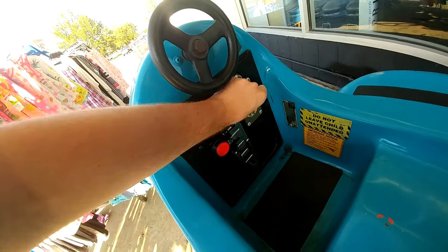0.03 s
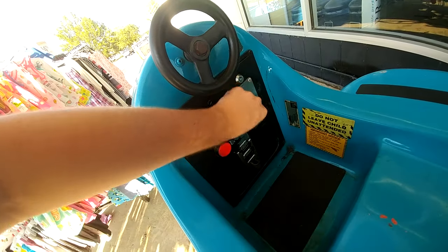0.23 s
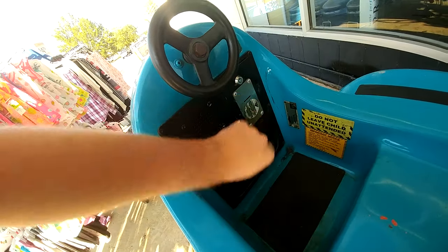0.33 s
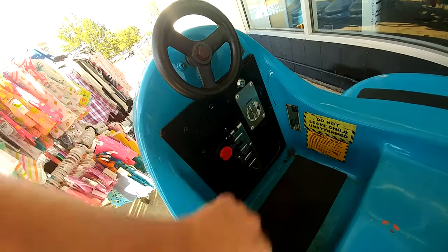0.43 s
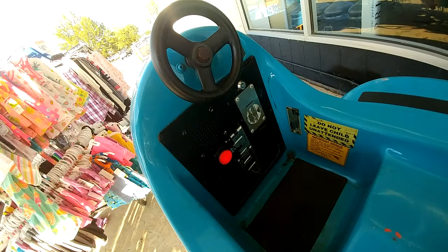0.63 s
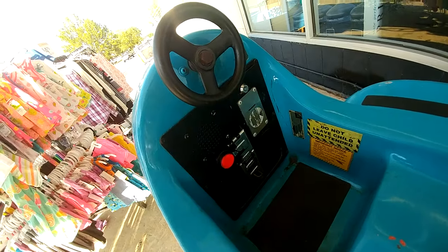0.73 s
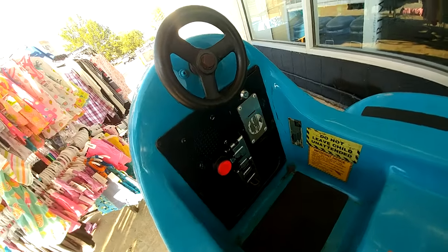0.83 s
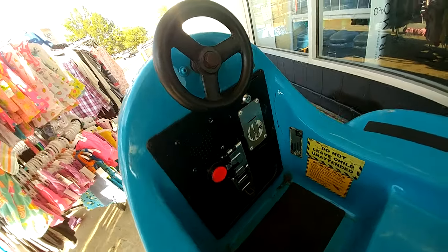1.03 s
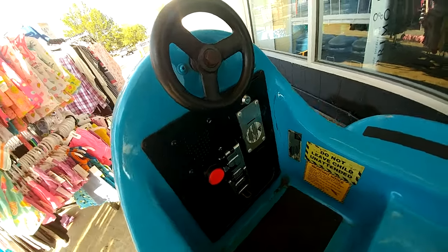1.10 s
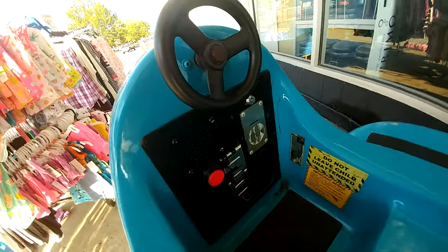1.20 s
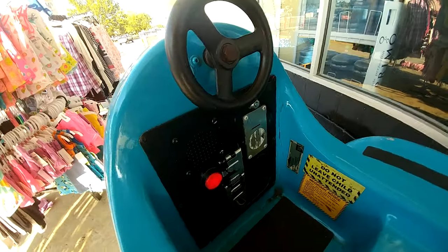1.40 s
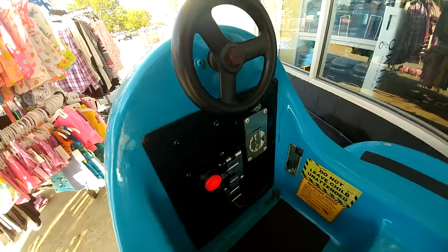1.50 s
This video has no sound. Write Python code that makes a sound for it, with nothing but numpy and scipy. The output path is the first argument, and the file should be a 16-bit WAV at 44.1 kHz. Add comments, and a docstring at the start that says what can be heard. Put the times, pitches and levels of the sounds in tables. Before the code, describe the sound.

A coin goes into an amusement ride's slot, heard close up, ticking and scraping on the metal plate for the first half second. At about 0.5 seconds it hits the mechanism with a loud steel clunk, and at 0.7 it bounces, ringing, in the cash box. Clothing brushes faintly near 1.3 seconds. A soft motor hum and low shop rumble continue throughout, ending at about 1.5 seconds.

```python
"""A coin goes into a fibreglass amusement ride, heard close up in a quiet shop.
It ticks, squeaks and scrapes on the slot plate, drops through the mechanism with a steel clunk,
then lands ringing in the cash box. Behind it a motor hums over low rumble and shop air;
clothing brushes faintly as the arm is drawn back. The stereo microphone's two ports
each colour the treble in their own way."""
import sys
import numpy as np
from scipy import signal
from scipy.fft import rfft, irfft
from scipy.io import wavfile

SR = 44100
rng = np.random.default_rng(int(sys.argv[2]) if len(sys.argv) > 2 else 0)


def file_out(sig):
    """Save sig as 16-bit WAV at sys.argv[1]."""
    # one column per channel
    cols = np.atleast_2d(sig).T
    # limit, then scale
    lim = np.clip(cols, -1, 1)
    pcm = np.round(lim * 32767).astype(np.int16)
    wavfile.write(sys.argv[1], SR, pcm)


N = 68355
T = np.arange(N) / SR

# Table levels are relative; "density" is level per hertz.
# likeness of the two channels: f/Hz, left-right correlation
STEREO_LIKENESS = [(60, 0.86), (160, 1), (380, 0.69), (700, 0.73), (1200, 0), (2400, 0.028), (15000, 0.063)]
# peaks and dips of each microphone port: f/Hz, gain/dB, width/Hz
LEFT_PORT = [(6300, -5, 2800), (9020, -23.5, 780), (10010, 11.5, 1700), (13300, 3.5, 5100)]
RIGHT_PORT = [(2600, 2, 3300), (7450, 13.5, 1240), (9400, -19, 870), (11700, -1, 12000)]

# reverberation of the shop: f/Hz, density/dB, t60/s
SHOP_REVERB = [(200, -12, .5), (1010, -8, 0.15), (6000, -5, 0.43), (15000, 7, 0.19)]
# spectra of the shop air, the low rumble and the clothing: f/Hz, density/dB
AIR_SPECTRUM = [(150, -29.5), (380, -9.5), (560, 1.5), (740, -3.5), (1050, -11.5), (1400, -17),
                (2200, -26.5), (4500, -31), (7500, -32.5), (11000, -34), (15500, -66)]
RUMBLE_SPECTRUM = [(20, -19), (32, -32), (50, -1), (65, -3), (82, -5.5), (125, -2.5), (170, -2), (240, -16),
                   (400, -25)]
CLOTH_SPECTRUM = [(1000, -4), (3000, 2), (6500, 8), (10000, -2), (15000, -15)]
# motor tones: f/Hz, level/dB, pitch waver/Hz
HUM_TONES = [(62.7, -42, 4.05), (97.5, -43, 3.04), (154.7, -31.5, 0.57), (599, -54.5, 3.21),
             (648, -51.5, 4.1)]
# rise and fall of the rumble, the hum and the clothing: t/s, level/dB
RUMBLE_SWELL = [(0, -2.5), (.25, 3.5), (.45, -4), (.65, 1), (.9, 1.5), (1.2, -2), (1.55, 0)]
HUM_SWELL = [(0, -3), (.15, -1.5), (.33, 3.5), (.52, -3), (.75, -1.5), (1.27, -0.5), (1.55, -1.5)]
CLOTH_SWELL = [(1.18, -66), (1.28, -56.5), (1.325, -46), (1.365, -50.5), (1.41, -62), (1.55, -66)]

# the coin touches the slot: t/s, plate level/dB, panel knock level/dB, rim tick level/dB
SLOT_TOUCHES = [(0.0245, -40.5, -44, -63), (.151, -41, -41.5, -59), (.184, -47, -48, -71),
                (0.228, -38.5, -41.5, -34.5), (0.2362, -24, -29.5, -46), (0.2859, -33.5, -41, -31),
                (0.3101, -20.5, -41.5, -40), (.327, -25, -47, -45), (.344, -30, -46, -33),
                (0.356, -35, -39.5, -32), (0.41, -29.5, -38, -31), (0.4201, -30.5, -32.5, -31),
                (0.4399, -17, -34, -13.5), (0.4486, -32, -32, -32), (0.473, -33.5, -43, -38)]
# dense rings of the slot plate, the panel around it, the coin's rim and the whole coin:
# f/Hz, density/dB, t60/s
PLATE_RING = [(1500, -23.5, 0.25), (2690, -13, 0.48), (3800, -22.5, 0.15), (5900, -4, 0.079), (7780, 2, .1),
              (8460, -4.5, 0.076), (11800, -14, 0.045), (15600, -14.5, 0.037)]
PANEL_RING = [(200, 0, 0.59), (520, -5.5, 0.22), (1260, -3, 0.36), (1850, -2.5, .15), (2900, -8.5, 0.067),
              (4470, -2, 0.23), (8000, -17, 0.19)]
RIM_RING = [(5000, -22, 0.11), (8500, -1, 0.11), (9950, 2.5, 0.084), (10900, -8, 0.094), (12200, 0, 0.045),
            (14500, -8, 0.041), (16000, -11, .06)]
COIN_RING = [(13000, -65, 0.12), (14600, -15, 0.1), (14900, -4, .13), (15740, 11, .14), (15500, -8, .13),
             (16300, -36, .1)]
# clear modes of the slot plate: f/Hz, level/dB, t60/s
PLATE_MODES = [(2350, -20, 0.28), (2816, -15, 0.33), (3100, -24, 0.14), (5930, -6, 0.073),
               (6800, -12, 0.046), (7640, -10, .08)]
# pressure of the sliding edge: t/s, level/dB
SCRAPE_PRESSURE = [(.284, -49), (.292, -26.5), (.306, -42), (.316, -32.5), (.36, -32.5), (.374, -50.5),
                   (.405, -42), (.42, -29)]
# tones of the sticking edge: f/Hz, level/dB
SQUEAK_TONES = [(3800, -43), (7830, -36), (10500, -27)]
# blows on the way in that set the coin itself ringing: t/s, level/dB
COIN_BLOWS = [(.3105, -25), (.327, -30), (.344, -39), (.5128, -40)]

# the coin's run down the chute: t/s, level/dB
ROLL_SWELL = [(.41, -44), (.45, -36), (.49, -39), (.53, -34), (.62, -47)]
# rumble of the chute: f/Hz, density/dB
CHUTE_SPECTRUM = [(120, -22), (220, -5.5), (270, -3.5), (350, -21), (700, -17)]
# the coin strikes the mechanism and rattles: t/s, level/dB
CLUNKS = [(0.5102, -11.5), (.5128, -11.5), (0.5159, -10.5), (0.5267, -17.5), (0.55, -19.5)]
# dense ring of the mechanism: f/Hz, density/dB, t60/s
MECHANISM_RING = [(158, -4, 0.71), (382, -23, 0.12), (633, -19, 0.32), (950, -4, 0.28), (1920, -0.5, 0.17),
                  (3800, -5.5, 0.23), (6580, 2.5, 0.11), (8800, -10, 0.13), (9700, 1, 0.071),
                  (13100, -12.5, 0.059), (16200, -23, 0.17)]
# modes of its steel housing: f/Hz, level/dB, t60/s
HOUSING_MODES = [(415, -16, .5), (524, -4, .33), (549, -8, .33), (638, -6, .27), (671, -4, .2),
                 (757, -4, .22), (921, -17, .6), (965, -8, .23), (1167, -9, .38), (1527, -5, .16),
                 (2244, -10, .29), (2858, -2, .16), (3207, -8, .33), (3712, -8, .23), (5006, -12, .22),
                 (6378, -10, .18), (6843, -8, .17), (8225, -11, .2), (9450, -22, .4)]

# bounces in the cash box: t/s, box level/dB, coin ring level/dB
LANDINGS = [(0.6991, -16, -22), (0.7028, -23, -12), (.7122, -35, -10), (0.729, -50, -29)]
# dense rings of the cash box and its floor: f/Hz, density/dB, t60/s
BOX_RING = [(192, 8, 0.19), (402, -3, 0.6), (780, 4.5, 0.27), (1340, 3, 0.13), (2600, -1.5, 0.22),
            (5150, 0, 0.2), (7400, -1.5, 0.21), (10700, 7.5, 0.18), (13500, -4, 0.15), (15500, 0.5, 0.1)]
BOX_FLOOR_RING = [(250, -26, 0.2), (760, 1.5, 0.076), (1200, 8, 0.066), (1780, -12.5, 0.13),
                  (4000, -10.5, .1), (7500, -17, 0.07), (14200, -21, .08)]
# clear modes of the cash box: f/Hz, level/dB, t60/s
BOX_MODES = [(250, -9, 0.44), (670.6, -4.5, 0.22), (776, 2, 0.12), (1198, -4, 0.16), (1636, -6.5, 0.12)]

CONTACT_S, SNAP_S = .0006, .0063  # time constants: a contact builds up, a ring's first snap dies


def from_db(db):
    """Decibels to gain."""
    return 10 ** (np.asarray(db) / 20)


def unit_rms(x):
    """Scale to rms 1."""
    return x / np.sqrt(np.mean(x ** 2) + 1e-20)


def at_hz(table, hz, column=1):
    """Read a table on a log-frequency axis."""
    table = np.array(table)
    return np.interp(np.log(hz + 1e-9), np.log(table[:, 0]), table[:, column])


def level_curve(rows, held=False):
    """Gain over time from rows of t/s, level/dB; silent outside them unless held."""
    outside = None if held else -200
    return from_db(np.interp(T, *np.transpose(rows), left=outside, right=outside))


def drift(rate_hz):
    """Smooth random wander with a spread of about 1."""
    hz = np.fft.rfftfreq(2 * N, 1 / SR)
    return unit_rms(irfft(rfft(rng.standard_normal(2 * N)) / (1 + (hz / rate_hz) ** 2)))[:N]


def stereo_noise(spectrum):
    """Coloured noise of rms 1, alike on both sides in the bass and unrelated in the treble."""
    hz = np.fft.rfftfreq(N, 1 / SR)
    mid, side = rfft(rng.standard_normal((2, N)))
    alike = at_hz(STEREO_LIKENESS, hz)
    white = np.sqrt(1 + alike) * mid + np.sqrt(1 - alike) * side * [[1], [-1]]
    rolloff = 1 / (1 + (hz / (2 * spectrum[-1][0])) ** 4)
    return unit_rms(irfft(white * from_db(at_hz(spectrum, hz)) * rolloff, N))


def dense_ring(body, snap=0, spacing_hz=90, spread_db=4.5):
    """Response of many close modes of uneven strength, dying band by band; snap lifts the attack."""
    hz = np.fft.rfftfreq(N, 1 / SR)
    mode_hz = np.arange(0, SR / 2, spacing_hz)
    mode_db = spread_db * np.clip(rng.standard_normal(len(mode_hz)), -2, 2)
    spectrum = rfft(stereo_noise(body)) * unit_rms(from_db(np.interp(hz, mode_hz, mode_db)))
    edges = np.geomspace(110, 20000, 22)
    ring = 0
    for low, high in zip(edges, edges[1:]):
        band = irfft(spectrum * ((hz >= low) & (hz < high)), N)
        t60 = at_hz(body, np.sqrt(low * high), column=2)
        ring += band * from_db(-60 * T / t60)
    onset = 1 - np.exp(-T / CONTACT_S)
    return ring * onset * (1 + snap * np.exp(-T / SNAP_S)) / (1 + snap / 2)


def impulses(times, levels_db):
    """One impulse for each contact."""
    force = np.zeros(N)
    force[(np.asarray(times) * SR).astype(int)] = from_db(levels_db)
    return force


def excite(force, response):
    """Pass a force or a sound through a stereo response."""
    return signal.fftconvolve(np.atleast_2d(force), response, axes=1)[:, :N]


def ring_modes(modes, force):
    """Each blow adds energy to every mode; each channel picks a mode up at its own phase."""
    ring = 0
    rise = 1 / (CONTACT_S * SR)
    for hz, db, t60 in modes:
        decay = from_db(-60 / (t60 * SR))
        energy = signal.lfilter([1], [1, -decay ** 2], force ** 2 + 1e-18)
        swing = signal.lfilter([rise], [1, -np.exp(-rise)], np.sqrt(energy))
        offset = np.arccos(at_hz(STEREO_LIKENESS, hz)) * rng.choice([-.5, .5])
        phase = 2 * np.pi * (hz * T + rng.random())
        ring += from_db(db) * swing * np.sin(phase + [[offset], [-offset]])
    return ring


def room_tone():
    """The bed of the shop: a slowly swelling rumble under steady air."""
    rumble = level_curve(RUMBLE_SWELL, held=True) * stereo_noise(RUMBLE_SPECTRUM)
    return from_db(-34.5) * rumble + from_db(-41) * stereo_noise(AIR_SPECTRUM)


def motor_hum(waver_db=.8, waver_rate_hz=4):
    """A motor hums in the centre, each tone wavering in level and pitch."""
    hum = 0
    for hz, db, waver_hz in HUM_TONES:
        amplitude = np.sqrt(2) * from_db(db + waver_db * drift(waver_rate_hz))
        cycles = np.cumsum(hz + waver_hz * drift(waver_rate_hz)) / SR
        hum += amplitude * np.sin(2 * np.pi * (cycles + rng.random()))
    return level_curve(HUM_SWELL, held=True) * hum


def clothing():
    """Cloth brushes with a faint hiss as the arm is drawn back."""
    return level_curve(CLOTH_SWELL) * stereo_noise(CLOTH_SPECTRUM)


def edge_scrape(plate, slips_per_s=1200, spread_db=10):
    """The coin's edge slides in tiny random slips, each ringing the plate."""
    slip_chance = slips_per_s / SR
    slips = (rng.random(N) < slip_chance) * rng.choice([-1, 1], N)
    strengths = from_db(spread_db * rng.uniform(-1, 1, N))
    drag = unit_rms(slips * strengths) * level_curve(SCRAPE_PRESSURE)
    rasp = excite(drag, unit_rms(plate) / np.sqrt(N))
    return rasp + ring_modes(PLATE_MODES, drag * np.sqrt(slip_chance) * from_db(-16))


def edge_squeak(start_s=.2878, length_s=.017, jitter_hz=29):
    """The edge sticks and sings for an instant, its pitch unsteady."""
    grip = np.sin(np.pi * np.clip((T - start_s) / length_s, 0, 1))
    tones = 0
    for hz, db in SQUEAK_TONES:
        cycles = np.cumsum(hz + jitter_hz * drift(400)) / SR
        tones += from_db(db) * np.sin(2 * np.pi * cycles)
    return grip * tones


def coin_in_slot(snap=1.6):
    """The coin ticks, scrapes and squeaks; knocks on the panel also ring the cash box behind it."""
    times, plate_db, knock_db, rim_db = np.transpose(SLOT_TOUCHES)
    plate = dense_ring(PLATE_RING, snap)
    taps, knocks = impulses(times, plate_db), impulses(times, knock_db)
    ticks = excite(taps, plate) + ring_modes(PLATE_MODES, taps * from_db(-20))
    panel = excite(knocks, dense_ring(PANEL_RING, snap))
    rim = excite(impulses(times, rim_db), dense_ring(RIM_RING, snap))
    scrape = edge_scrape(plate)
    shimmer = excite(impulses(*np.transpose(COIN_BLOWS)), dense_ring(COIN_RING))
    squeak = edge_squeak()
    box = ring_modes(BOX_MODES, knocks * from_db(-8.5))
    return ticks + panel + rim + scrape + shimmer + squeak + box


def coin_in_mechanism():
    """The coin rumbles down the chute; a quick cluster of blows rings the steel housing."""
    blows = impulses(*np.transpose(CLUNKS))
    clunk = excite(blows, dense_ring(MECHANISM_RING, snap=.57))
    housing = from_db(-7) * ring_modes(HOUSING_MODES, blows)
    roll = level_curve(ROLL_SWELL) * stereo_noise(CHUTE_SPECTRUM)
    return roll + clunk + housing


def coin_in_cash_box():
    """The free coin bounces in the box, rings very high and settles with a dull knock."""
    times, box_db, coin_db = np.transpose(LANDINGS)
    bounces, settle = impulses(times, box_db), impulses(times=[.79], levels_db=[-31])
    clatter = excite(bounces, dense_ring(BOX_RING, snap=.17))
    box = from_db(-8) * ring_modes(BOX_MODES, bounces + settle)
    shimmer = excite(impulses(times, coin_db), dense_ring(COIN_RING))
    knock = excite(settle, dense_ring(BOX_FLOOR_RING))
    return clatter + box + shimmer + knock


def scene():
    """Beside the ride: the coin mostly direct, with a little of the shop's reverberation."""
    coin = coin_in_slot() + coin_in_mechanism() + coin_in_cash_box()
    shop = unit_rms(dense_ring(SHOP_REVERB)) / np.sqrt(N)
    reverb = from_db(-16.5) * excite(coin, shop)
    return coin + reverb + motor_hum() + room_tone() + clothing()


def microphone_port(x, resonances):
    """The port's resonances put a chain of peaks and dips on one channel."""
    for hz, db, width_hz in resonances:
        gain = from_db(db / 2)
        width = np.tan(np.pi * width_hz / SR)
        centre = -2 * np.cos(2 * np.pi * hz / SR)
        x = signal.lfilter([1 + width * gain, centre, 1 - width * gain],
                           [1 + width / gain, centre, 1 - width / gain], x)
    return x


def record(dry, fade_in_s=.003, ceiling=1.2, cutoff_hz=16000):
    """Stereo microphone: each port colours its side, peaks are rounded and the top is cut."""
    heard = np.array([microphone_port(dry[0], LEFT_PORT), microphone_port(dry[1], RIGHT_PORT)])
    heard *= np.minimum(T / fade_in_s, 1)
    rounded = ceiling * np.tanh(heard / ceiling)
    return signal.sosfilt(signal.ellip(12, .2, 80, cutoff_hz, fs=SR, output="sos"), rounded)


dry = scene()
out = record(dry)
file_out(out)
```